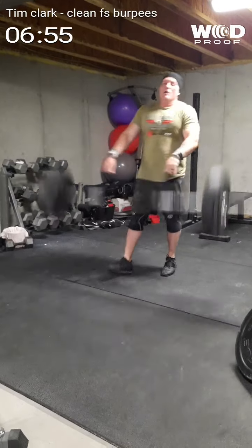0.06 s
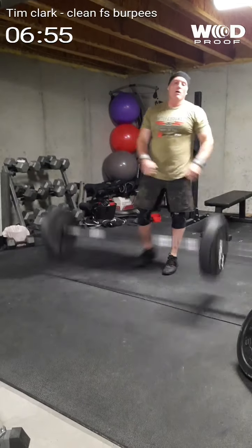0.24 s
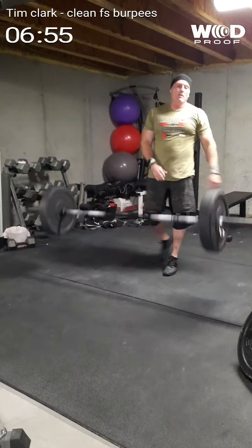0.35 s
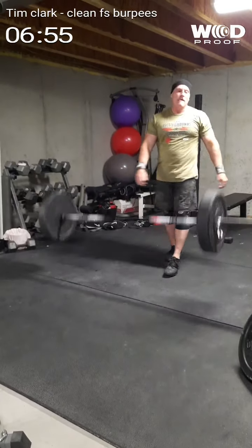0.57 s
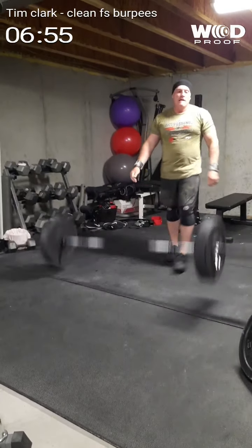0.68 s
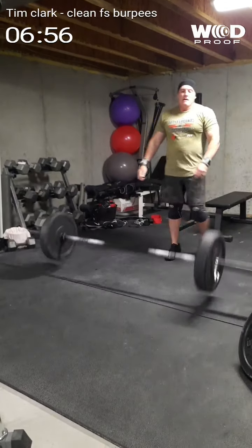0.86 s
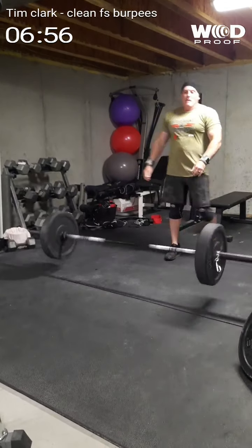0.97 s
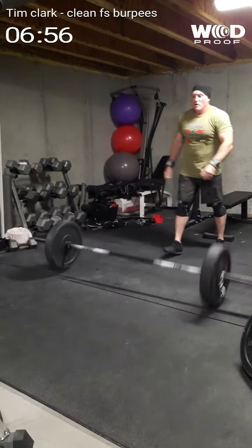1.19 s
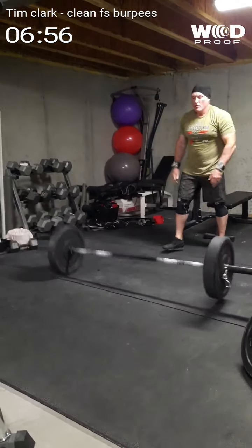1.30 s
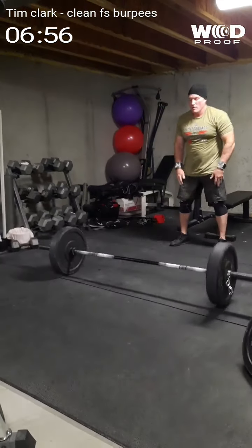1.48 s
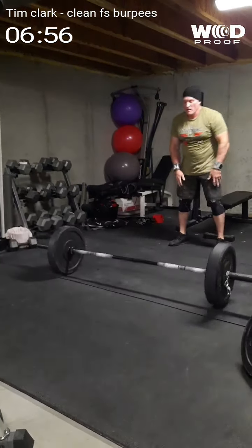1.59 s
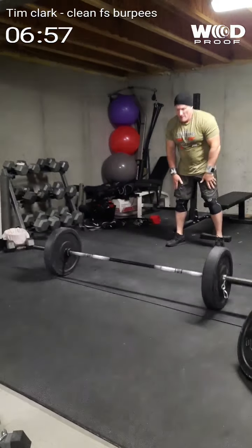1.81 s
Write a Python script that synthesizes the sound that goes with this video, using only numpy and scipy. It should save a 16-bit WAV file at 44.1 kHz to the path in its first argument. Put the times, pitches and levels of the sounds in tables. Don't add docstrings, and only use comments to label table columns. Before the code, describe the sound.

A loaded barbell falls with a faint whirr and tiny collar ticks, then hits rubber matting at about 0.18 seconds: a hard knock, deep slab boom and loud metallic clatter. The bare basement rings. Light ticks precede a softer, boomy second landing at 0.78. Weaker thuds follow near 1.15 and 1.4, then rocking bumps and sleeve clanks around 1.5 and 1.7, over faint hum through a phone microphone.

```python
import sys
import numpy as np
from scipy import signal
from scipy.fft import rfft, irfft
from scipy.io import wavfile
from scipy.ndimage import uniform_filter1d

SR = 44100
rng = np.random.default_rng(int(sys.argv[2]) if len(sys.argv) > 2 else 0)


def wav_out(sig):
    wavfile.write(sys.argv[1], SR, np.round(np.clip(np.atleast_2d(sig).T, -1, 1) * 32767).astype(np.int16))


def nominal_scale(level):
    x = np.asarray(level, float) / 20
    return 10 ** x


N = 81585

# start in seconds, knock level in dB, thump level in dB, contact in seconds.
LANDINGS = [(.179, -9.5, -16.5, 0.0018), (.25, -31, -23, 0.0038), (0.782, -32, -30, 0.0017),
            (.82, -28, -25.5, 0.0025), (1.146, -37, -32, 0.0037), (1.235, -37, -34.5, 0.002),
            (1.381, -35.5, -36, 0.0014), (1.40, -29.5, -48, .003), (1.47, -27, -40, 0.0032),
            (1.515, -27.5, -39, 0.0027), (1.57, -37.5, -44, 0.0011), (1.68, -37.5, -35.5, 0.0022),
            (1.725, -35.5, -39, 0.00265), (1.837, -33.5, -34.5, 0.0018)]
# pitch in Hz, level in dB, time to fade by 60 dB in seconds.
PLATES = [(132, -14.5, 0.073), (161.6, -7.5, 0.2), (191.3, -10.5, 0.14), (235.6, -8, 0.36),
          (256.3, -6, 0.5), (296, -4, 0.47), (324.1, 3.5, 0.69), (344.4, 4.5, 0.37), (460, -15, 0.27),
          (481, -6.5, 0.071), (770, -6, .1)]
# frequency in Hz, level in dB per Hz.
THUMP = [(50, -2), (90, 0), (160, 1), (210, -2.5), (280, 5), (500, -7.5), (900, -21), (2200, -42)]
PLATE_DETUNE, KNOCK_RISE_S = 0.005, 0.0028
THUMP_RISE_S, THUMP_HOLD_S, THUMP_T60_S = 0.0047, 0.023, 0.33
SLAP_DB, SLAP_HZ, SLAP_S = 3.5, 2260, 0.00071

# start in seconds, peak in dB, pitch in Hz, swell in seconds.
BOOMS = [
    (0.181, -21, 57.4, 0.037),
    (0.288, -27, 52, .03),
    (.783, -17.5, 56, 0.024),
    (1.147, -23.5, 55, 0.024),
    (1.225, -22, 47, 0.022),
    (1.39, -29.5, 52, 0.023),
    (1.509, -31, 54.6, 0.035),
    (1.565, -30, 46, 0.016),
    (1.716, -31.5, 53.3, 0.02),
    (1.78, -41, 42, 0.015),
]
# pitch in Hz, level in dB, time to fade by 60 dB in seconds.
SLAB = [(46, -19, 0.94), (57.14, 3, 1), (69.7, -0.5, 1), (79.6, 5.5, 0.97), (96, -13, 0.5)]
BOOM_GLIDE_PER_S, BOOM_PUSH_S, SLAB_DB = -0.94, 0.011, -11
MAT_HZ, MAT_DB, MAT_T60_S = 155, -6.5, 0.16

# start in seconds, level in dB, rise in seconds, hold in seconds,
# share of the sleeve in dB.
CLATTER = [
    (0.179, -20, 0.0059, .14, -30),
    (0.781, -21.5, 0.018, 0.1, -6),
    (1.152, -24.5, .017, 0.014, -8),
    (1.21, -34, 0.019, 0.053, -23),
    (1.395, -27, 0.016, 0.0064, -13),
    (1.493, -27.5, 0.0095, 0.036, 1.5),
    (1.56, -37.5, 0.023, 0.026, -26),
    (1.689, -31, 0.0099, .012, 1.5),
    (1.735, -45, 0.012, 0.026, -8),
]
# frequency in Hz, level in dB per Hz.
CLACK = [(290, -34), (500, -5.5), (708, -13.5), (2690, -2.5), (3340, -6.5), (5240, -5.5), (7420, -7.5),
         (9920, -23.5), (16000, -18)]
# pitch in Hz, width in Hz, level in dB.
STEEL = [(1880, 160, -9), (2770, 800, -6), (2880, 190, 3), (3080, 55, -1), (4170, 72, -19), (5200, 270, -3),
         (5360, 170, -1), (5720, 72, 4), (6340, 220, -4), (6960, 210, -4), (10840, 520, -1.5)]
# pitch in Hz, width in Hz, level in dB.
SLEEVE = [(2150, 70, 9), (2450, 90, 4), (4000, 90, 2), (4780, 50, 4), (7200, 200, 2), (13500, 250, -6)]
CLATTER_RELEASE_S, CLICKS_PER_S, SAG_DB_PER_S, STEEL_DB = 0.035, 9000, -17, 4.5
CLICK_SPREAD_DB, LUMP_DB, LUMP_S = 2.0, 1.3, 0.006

# time in seconds, peak in dB.
TICKS = [(0.0333, -39.5), (0.0588, -41), (0.1072, -40), (0.6064, -39.5), (0.6544, -41.5), (0.7044, -46),
         (0.7332, -48), (0.7567, -47), (1.6995, -28.5), (1.7744, -39)]
# pitch in Hz, width in Hz, level in dB.
COLLAR = [(2990, 300, 7), (5350, 90, 3), (6500, 5000, -1), (7200, 410, 6), (7740, 280, -4),
          (10720, 500, -2), (13600, 200, -5)]
TICK_DB, TICK_S = -8.5, 0.0092

# frequency in Hz, level in dB per Hz.
WHIRR = [(40, -20), (180, -1.5), (350, -2), (900, -16.5), (2700, -9.5), (3600, -20), (8000, -26),
         (10000, -43)]
WHIRR_DB, WHIRR_END_S = -42, 0.168

# frequency in Hz, time to fade by 60 dB in seconds.
ROOM = [(60, 1), (300, 0.61), (1000, 0.94), (3000, 0.81), (8000, 0.57), (15000, 0.45)]
ROOM_DB, THUD_ROOM_DB, ROOM_RISE_S = -4, -6.5, 0.016

# frequency in Hz, level in dB per Hz.
HUM = [(30, -5), (130, -4), (328, 8), (844, -1), (2980, -16), (7470, -15), (10000, -26), (16000, -14)]
HUM_DB = -58.5

BASS_CUT_HZ, TOP_HZ, SOFT_CLIP = 29, 15750, 1


def unit(x):
    return x / np.sqrt(np.mean(x ** 2))


def colour(x, table):
    hz = np.maximum(np.fft.rfftfreq(len(x), 1 / SR), 1)
    points = np.array(table)
    gain_db = np.interp(np.log(hz), np.log(points[:, 0]), points[:, 1])
    return irfft(rfft(x) * nominal_scale(gain_db), len(x))


def ring(modes, strengths):
    t = np.arange(SR) / SR
    out = np.zeros(SR)
    for (hz, db, t60), strength in zip(modes, strengths):
        out += strength * nominal_scale(db) * np.sin(2 * np.pi * hz * t) * np.exp(-np.log(1000) * t / t60)
    return out


def resonate(x, table):
    out = np.zeros(len(x))
    for hz, width, db in table:
        wide = signal.lfilter(*signal.iirpeak(hz, hz / width, fs=SR), x)
        steep = signal.lfilter(*signal.iirpeak(hz, hz / (4 * width), fs=SR), wide)
        out += nominal_scale(db) * np.sqrt(SR / width) / 25 * steep
    return out


def push(seconds):
    force = np.sin(np.pi * np.arange(0, 1, 1 / max(seconds * SR, 2)))
    return force / force.sum()


def add(track, s, sound):
    i = int(max(s, 0) * SR)
    track[i:i + len(sound)] += sound[:N - i]


def landings():
    out = np.zeros(N)
    t = np.arange(SR) / SR
    thump_decay = np.exp(-np.log(1000) * np.maximum(t - THUMP_HOLD_S, 0) / THUMP_T60_S)
    thump_fade = np.clip(t / THUMP_RISE_S, 0, 1) * thump_decay
    for s, knock_db, thump_db, contact in LANDINGS:
        chance = rng.standard_normal((2, len(PLATES)))
        plates = [(hz * (1 + PLATE_DETUNE * c), db, t60) for (hz, db, t60), c in zip(PLATES, chance[0])]
        knock = ring(plates, 1 + 0.4 * chance[1]) * (1 - np.exp(-t / KNOCK_RISE_S))
        add(out, s, nominal_scale(knock_db - 2) * signal.fftconvolve(knock, push(contact)))

        thump = unit(colour(rng.standard_normal(SR), THUMP))
        add(out, s, nominal_scale(thump_db) * thump_fade * thump)

        slap = np.sin(2 * np.pi * SLAP_HZ * t) * np.exp(-t / SLAP_S)
        hardness = (0.0019 / contact) ** 2
        add(out, s + contact / 2, nominal_scale(knock_db + SLAP_DB) * slap * hardness)
    return out


def booms():
    out = np.zeros(N)
    t = np.arange(SR) / SR
    for s, db, hz, swell in BOOMS:
        phase = 2 * np.pi * hz * (t + BOOM_GLIDE_PER_S * t ** 2 / 2)
        shape = (t / swell * np.exp(1 - t / swell)) ** 2
        add(out, s, nominal_scale(db) * shape * np.sin(phase))
        add(out, s, nominal_scale(db + MAT_DB) * ring([(MAT_HZ, 0, MAT_T60_S)], [1]))
        slab = ring(SLAB, rng.choice([-1, 1], size=len(SLAB)))
        add(out, s, nominal_scale(db + SLAB_DB) * signal.fftconvolve(slab, push(BOOM_PUSH_S)))
    return out


def clatter():
    t = np.arange(N) / SR
    hits = rng.random(N) < CLICKS_PER_S / SR
    signs = np.sign(rng.standard_normal(N))
    strength = nominal_scale(CLICK_SPREAD_DB * np.minimum(rng.exponential(size=N), 4))
    lumps = unit(uniform_filter1d(rng.standard_normal(N), int(LUMP_S * SR)))
    clicks = unit(hits * signs * strength * nominal_scale(LUMP_DB * lumps))

    plates, sleeve = np.zeros(N), np.zeros(N)
    for s, db, rise, hold, sleeve_db in CLATTER:
        attack = np.clip((t - s) / rise, 0, 1)
        release = np.exp(-np.maximum(t - s - rise - hold, 0) / CLATTER_RELEASE_S)
        shape = attack * release * nominal_scale(SAG_DB_PER_S * np.maximum(t - s, 0))
        plates += nominal_scale(db) * shape
        sleeve += nominal_scale(db + sleeve_db) * shape
    clacks = unit(colour(clicks, CLACK)) * plates
    bar = nominal_scale(STEEL_DB) * resonate(clicks * plates, STEEL)
    return clacks + bar + resonate(clicks * sleeve, SLEEVE)


def collars():
    taps = np.zeros(N)
    t = np.arange(SR // 20) / SR
    for s, db in TICKS:
        scratch = rng.standard_normal(len(t)) * np.exp(-t / TICK_S)
        add(taps, s, nominal_scale(db + TICK_DB) * scratch)
    return resonate(taps, COLLAR) * 10


def whirr():
    fade = np.clip((WHIRR_END_S - np.arange(N) / SR) / 0.02 + 1, 0, 1)
    return nominal_scale(WHIRR_DB) * unit(colour(rng.standard_normal(N), WHIRR)) * fade


def room(x):
    t = np.arange(SR) / SR
    tail, points = np.zeros(SR), np.array(ROOM)
    for hz in 45 * 2 ** np.arange(0, 8.6, 0.5):
        band_filter = signal.butter(2, [hz / 1.19, hz * 1.19], "band", fs=SR, output="sos")
        band = signal.sosfilt(band_filter, rng.standard_normal(SR))
        t60 = np.interp(np.log(hz), np.log(points[:, 0]), points[:, 1])
        tail += band * np.exp(-np.log(1000) * t / t60)
    tail *= 1 - np.exp(-t / ROOM_RISE_S)
    return signal.fftconvolve(x, tail / np.sqrt(np.sum(tail ** 2)))[:N]


def hum():
    return nominal_scale(HUM_DB) * unit(colour(rng.standard_normal(N), HUM))


def scene():
    thud = landings()
    metal = clatter() + collars()
    echo = room(nominal_scale(THUD_ROOM_DB) * thud + nominal_scale(ROOM_DB) * metal)
    return (booms() + thud + metal + echo + whirr() + hum())[None]


def low_pass(x):
    return signal.sosfilt(signal.butter(12, 16990, fs=SR, output="sos"), x)


def record(dry):
    x = signal.sosfilt(signal.butter(4, BASS_CUT_HZ, "high", fs=SR, output="sos"), dry)
    x = SOFT_CLIP * np.tanh(x / SOFT_CLIP)
    x = signal.sosfilt(signal.ellip(10, 0.2, 60, TOP_HZ, fs=SR, output="sos"), x)
    return low_pass(x)


dry = scene()
out = record(dry)
wav_out(out)
```